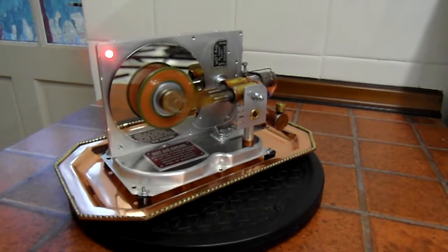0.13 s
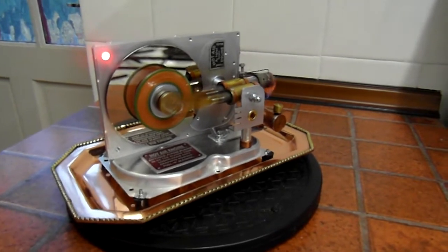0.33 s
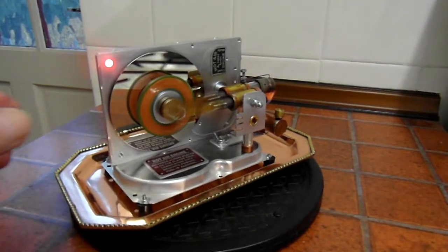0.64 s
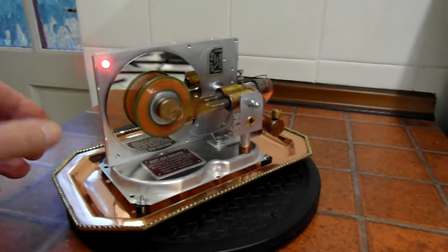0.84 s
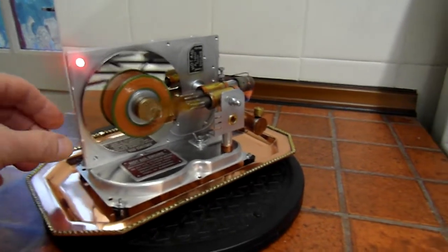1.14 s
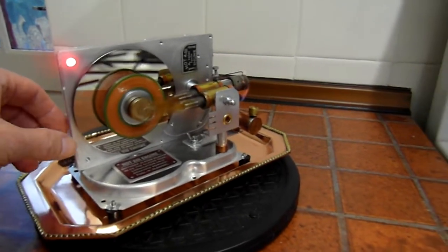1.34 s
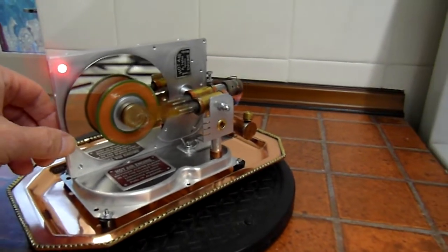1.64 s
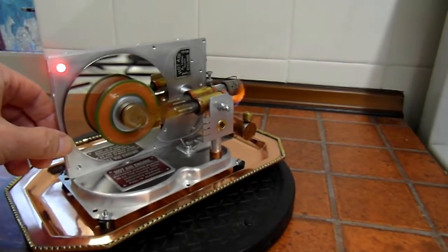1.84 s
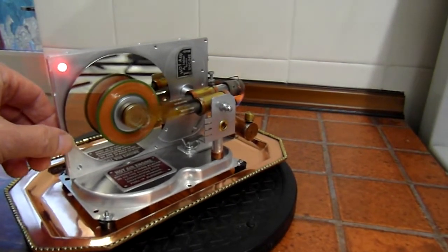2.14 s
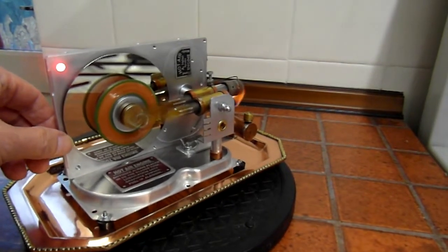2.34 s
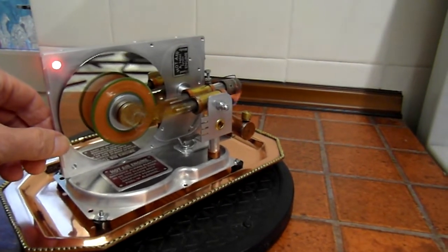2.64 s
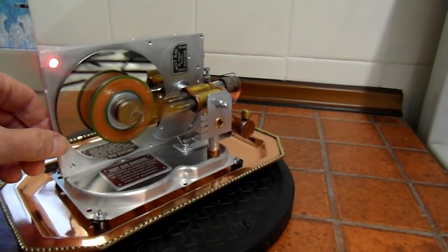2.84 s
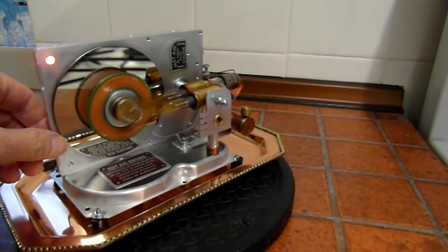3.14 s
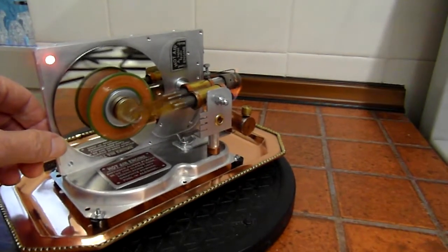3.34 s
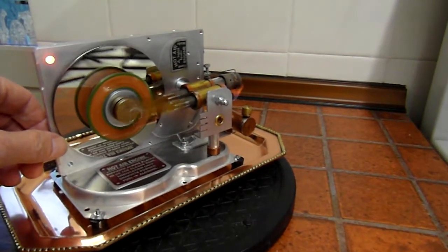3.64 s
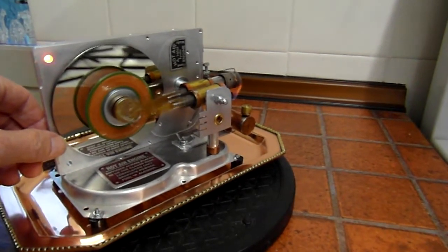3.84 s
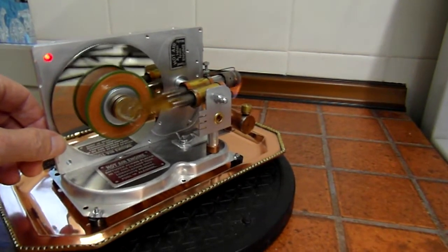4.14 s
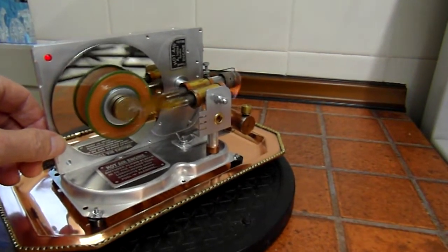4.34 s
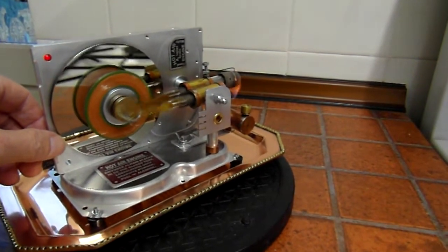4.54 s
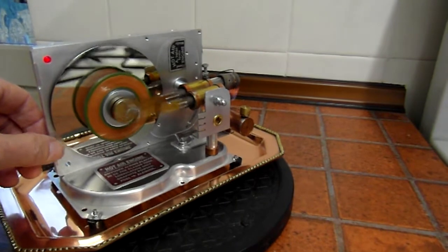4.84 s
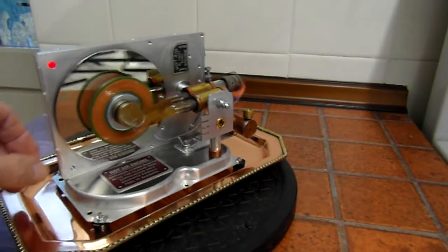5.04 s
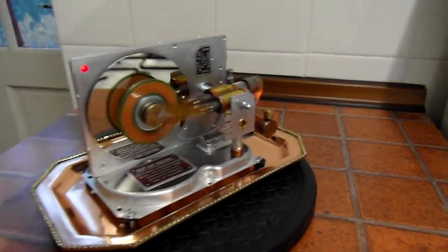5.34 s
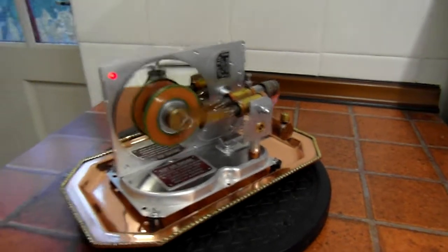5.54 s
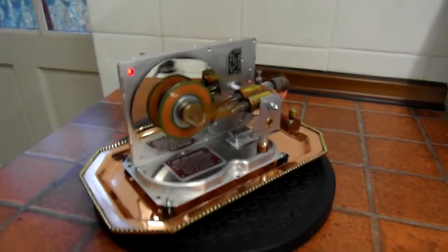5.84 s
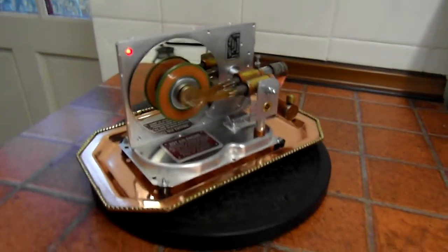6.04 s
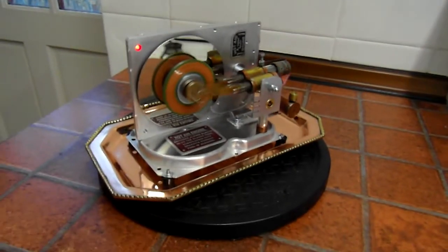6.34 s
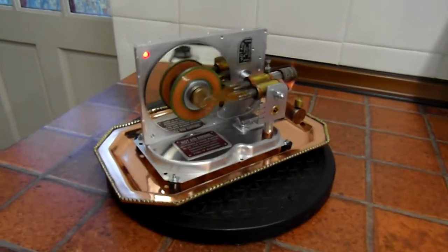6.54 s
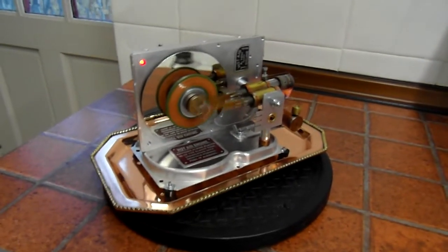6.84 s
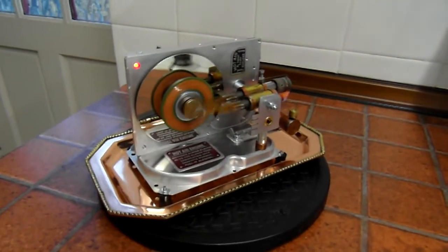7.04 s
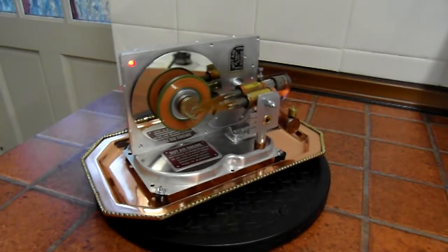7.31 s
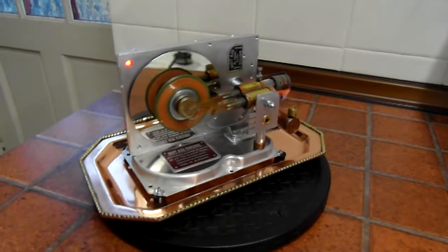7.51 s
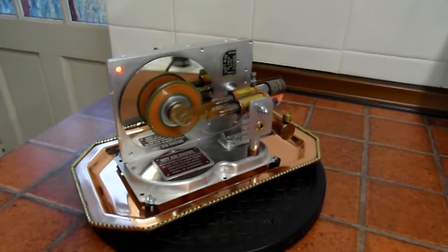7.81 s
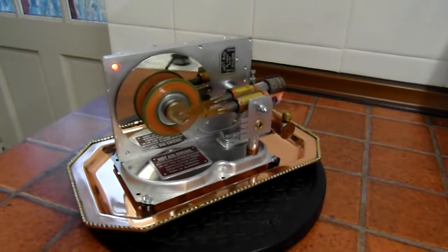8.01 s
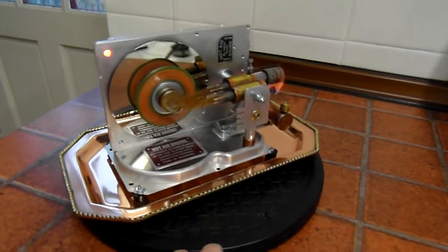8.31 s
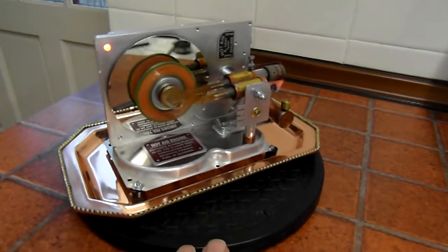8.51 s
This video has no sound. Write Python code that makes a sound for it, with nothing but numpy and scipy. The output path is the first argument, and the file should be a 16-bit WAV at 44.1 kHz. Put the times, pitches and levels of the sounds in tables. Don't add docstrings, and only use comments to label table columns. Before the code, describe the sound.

A tiny engine chatters continuously: four quick metal knocks each turn blur into a rattling purr with crisp clicks and thin rings. After two seconds it slows in steps until about four and a half, where a run of hard ticks stands out, then climbs partway back. Close stereo microphone with handling thumps, in a tiled kitchen with faint background hum.

```python
import sys
import numpy as np
from scipy import signal
from scipy.fft import rfft, irfft, next_fast_len
from scipy.io import wavfile
from scipy.ndimage import uniform_filter1d

SR = 44100
rng = np.random.default_rng(int(sys.argv[2]) if len(sys.argv) > 2 else 0)


def wav_record(signal):
    frames = np.transpose(np.atleast_2d(signal))
    bounded = np.clip(frames, -1, 1)
    quanta = np.round(bounded * 32767).astype(np.int16)
    wavfile.write(sys.argv[1], SR, quanta)


def nominal_scale(level):
    x = np.asarray(level, float) / 20
    return 10 ** x


N = 382347


CRANK_TURNS = (.011, .485)
# speed in turns/s, first strike in turns, second strike in turns.
DISPLACER = [(17.4, .385, .955), (18.3, .395, .94), (19.2, .38, .925), (19.3, .378, .865), (20.5, .36, .86),
             (22.6, .32, .85), (26.7, .255, .74)]
# chatter time in seconds, then dB into base, plate, linkage, cylinder and bare clicks.
CONTACTS = [
    (0.0045, -10, -7, -8, -18, -8),
    (0.005, -2, -8, -7, -12, -12),
    (0.003, -6, -12, -15, -5, -16),
    (0.003, -5, -9, -13, -9, -15),
]
# timing slop in turns, strength spread in dB, chatter share, dB stronger per extra turn/s.
CONTACT_PLAY = [
    (.002, 0.8, 0.15, 0.25),
    (.005, 1.5, 0.085, 0.25),
    (.005, 2.0, 0.13, 0.3),
    (.005, 2.0, 0.08, 0.8),
]
# pitch in Hz, 60 dB fade in seconds, peak in dB at 22 turns/s, dB per extra turn/s.
PINGS = [
    [(1800, .01, -33, .3), (2450, .015, -25, 1.1), (3400, .03, -26, -.5), (3510, .02, -22.5, 1.1),
     (4125, .04, -22, .1), (4700, .016, -19, -.8), (5300, .01, -29, 0), (6100, .005, -29, -.3),
     (8500, .003, -27, .8), (7350, .003, -16, .4), (9700, .003, -21, .7)],
    [(2530, .014, -26, 1.9), (3155, .045, -27.5, -.8), (3500, .02, -30, .3), (3910, .025, -31, 0),
     (4110, .03, -31, -.3), (4650, .015, -29, -.5)],
    [(1345, .03, -31, 1.2), (7400, .004, -27, .6), (10200, .003, -24, .2)],
    [(3100, .025, -31, .3), (7400, .004, -28, .6), (10200, .003, -25, .2)],
]
PING_SPREAD_DB = [2.2, 3, 2, 2]
# pitch in Hz, level in dB, 60 dB fade in seconds.
BASE = [(1218, 3.2, 0.13), (1278, 8.4, 0.074), (1412, 25, 0.0098)]
# pitch in Hz, level in dB, 60 dB fade in seconds.
PLATE = [(1627, -2, 0.0079), (1852, -2, 0.011), (2063, -6.5, 0.019), (2423, 2, 0.011), (2493, 3.5, 0.0089),
         (2836, 1, 0.0055)]
# pitch in Hz, level in dB, 60 dB fade in seconds.
LINKAGE = [(2896, -9.5, 0.025), (3168, -6.5, 0.028), (3225, -9, 0.028), (3476, 1.5, 0.0088),
           (3870, -6, 0.019), (4080, 0.5, 0.025), (4164, 1, 0.013), (4600, 1, 0.0046), (5160, -20, 0.063),
           (5360, -8, 0.0094)]
# pitch in Hz, level in dB, 60 dB fade in seconds.
CYLINDER = [(11075, -6, .03), (11275, 0, .04), (11330, 0, .035), (11460, -3, .045)]
# pitch in Hz, level in dB.
CLICK_COLOUR = [(600, -21), (1100, -9), (2000, -28), (4500, 13), (6400, 13.5), (7400, 18.5), (8500, 14.5),
                (9800, 18), (11000, 17.5)]
# time in seconds, level in dB.
FACING = [(0, -0.5), (3.6, 0), (4.0, -0.5), (4.4, 0.8), (5.2, 1), (5.7, -1), (7.6, -1.1), (8.0, 0),
          (8.67, 0.4)]
# dB at 22 turns/s, dB per extra turn/s, share of the facing swing.
LOUDNESS_LAW = [
    (-27, 0.5, 0.18),
    (-28.5, 0.44, 1.1),
    (-27.5, 0.4, 2.3),
    (-25.5, 0.52, 0.85),
]


def metalwork(angle, speed):
    faster = speed - 22
    facing_db, = in_time(FACING)
    plate_db, *other_db = [db + per_turn_db * faster + share * facing_db
                           for db, per_turn_db, share in LOUDNESS_LAW]
    contact_turns = [*CRANK_TURNS, *at_speed(DISPLACER, speed)]
    forces, clean = np.zeros((5, N)), 0
    for turn, contact, play, modes, luck_db in zip(
            contact_turns, CONTACTS, CONTACT_PLAY, PINGS, PING_SPREAD_DB):
        chatter_s, *share_db = contact
        slop_turns, spread_db, share, gain_db = play
        hit = blows(angle - turn, slop_turns, spread_db)
        clean = clean + pings(hit, modes, luck_db, angle, faster)
        hit = nominal_scale(gain_db * faster) * hit
        dying = signal.lfilter([1], [1, -np.exp(-1 / (chatter_s * SR))], hit)
        chatter = share * dying * grains(per_s=16000, size_db=1.2)
        forces += nominal_scale(np.array(share_db))[:, None] * (hit + chatter)

    seat_s, seat_db = .0023, 8
    forces[3] += nominal_scale(seat_db) * np.roll(forces[3], round(seat_s * SR))

    rattle = nominal_scale(-34 + .5 * faster) * [grains(per_s=9000, size_db=2.0) for part in forces]
    rattle_db = np.array([21.0, -1.5, -4.5, -30.0, -2.0])
    forces += nominal_scale(rattle_db)[:, None] * rattle

    part_modes, signs = (BASE, PLATE, LINKAGE, CYLINDER), (-1, -1, -1, 1)
    parts = [body(force, modes, angle, spread_db=1.14, hold_turns=.5, turn_sign=sign)
             for force, modes, sign in zip(forces, part_modes, signs)]
    clicks = high_pass(colour(forces[4], CLICK_COLOUR), 4, 500)
    parts.append(even(clicks))
    levels_db = [plate_db - 9.5, plate_db - 4.5, *other_db]
    return [nominal_scale(db) * part for db, part in zip(levels_db, parts)] + [clean]


def pings(hit, modes, spread_db, angle, faster):
    bounce_s, bounce_db = .0017, -10
    hit = hit + nominal_scale(bounce_db) * np.roll(hit, round(bounce_s * SR))
    turn = (angle + .2).astype(int)
    luck = nominal_scale(spread_db * rng.standard_normal((len(modes), turn.max() + 1)))
    rings = 0
    for k, (hz, t60, db, per_turn_db) in enumerate(modes):
        force = nominal_scale(db + per_turn_db * faster) * luck[k, turn] * hit
        rings = rings + ring(force, hz, t60)
    return high_pass(rings, 4, 1000)


# time in seconds, peak in dB.
TICKS = [
    (0.157, -8),
    (1.9948, -21),
    (2.9143, -6),
    (3.8568, -17),
    (4.2915, -5),
    (4.345, -2),
    (4.4028, 0),
    (4.459, -3),
    (4.6856, -5),
    (5.0698, -5),
]
# pitch in Hz, level in dB, 60 dB fade in seconds.
TICK_RINGS = [(4650, -20, .015), (7400, -18, .004), (9900, -14, .003), (11300, -12, .05)]


def ticks():
    force = impulses(TICKS)
    return sum(nominal_scale(db) * ring(force, hz, t60) for hz, db, t60 in TICK_RINGS)


# pitch in Hz, level in dB, 60 dB fade in seconds.
BOOM = [(135.6, 6.5, 0.4), (172, 3, 0.14)]
# pitch in Hz, level in dB, 60 dB fade in seconds.
DRUM = [(359.6, -6.5, 0.08), (398, 3.5, 0.053), (425.3, 2.5, 0.093), (491, 0, 0.05)]
# pitch in Hz, level in dB, 60 dB fade in seconds.
LOWER_RING = [(560, -1, 0.076), (598, 1, 0.08)]
# pitch in Hz, level in dB, 60 dB fade in seconds.
UPPER_RING = [(618, 2, 0.076), (636, 5, 0.1), (690, -4, 0.05)]
# pitch in Hz, level in dB, 60 dB fade in seconds.
RIM = [(755, 2, .06), (805, 1, .07), (855, 3, .07), (968, -1.5, 0.08), (1018, 1, 0.08), (1066, 4, 0.084)]
# pitch in Hz, level in dB, 60 dB fade in seconds.
FLAP = [(192, 2.5, 0.063), (243.7, 1.1, 0.21), (303.4, 1.6, 0.069)]
# pitch in Hz, level in dB, 60 dB fade in seconds.
EDGE = [(724.6, 0, 0.44)]
# speed in turns/s, then boom, drum, lower ring, upper ring and rim levels in dB.
TRAY_RESPONSE = [(17.2, -65, -42, -47, -43, -49), (17.73, -56.5, -38, -45, -41, -42),
                 (18.12, -57, -43, -39.5, -36.5, -43.5), (17.7, -68, -40, -43, -37, -42),
                 (19.3, -57, -41, -37, -39, -39), (19.75, -52, -43.5, -33.5, -41, -39.5),
                 (20.4, -60, -41.5, -42, -38, -44.5), (21.2, -59, -43.5, -38.5, -37, -41),
                 (22.38, -54.5, -43, -37.5, -36.5, -40.5), (23.6, -49, -43, -40.5, -42, -41),
                 (24.7, -52.5, -40, -42, -33.5, -44), (27.8, -57.5, -42.5, -46, -41, -41)]
# speed in turns/s, angle of the kick in turns, flap and hum level in dB.
ROCKING = [(17.46, 0.012, -58), (18.42, -0.0826, -52.5), (19.52, -0.0272, -54), (20.03, 0.047, -53),
           (22.25, 0.012, -48), (23.1, 0.094, -50), (25.56, -0.193, -48.5), (26.7, -0.27, -47.5)]
# speed in turns/s, level in dB.
EDGE_RESPONSE = [(18, -56), (25.5, -54), (26.55, -46), (26.8, -45)]


def tray(angle, speed):
    kick_turns, flap_db = at_speed(ROCKING, speed)
    first, second, third, rock = [blows(angle - turn, .001, 1.0) for turn in (.75, .42, .88, kick_turns)]
    loose = 0.015 * grains(per_s=1400, size_db=1.0)
    modes = (BOOM, DRUM, LOWER_RING, UPPER_RING, RIM, FLAP, EDGE)
    forces = [first + 0.5 * second, second + 0.62 * third, rock + 0.18 * second,
              rock + 0.82 * second, rock + 0.56 * second, first + 0.5 * second, rock]
    loose_share = [0.21, 0.75, 0.38, 1.35, 0.94, 0.41, 0.54]
    trim_db = [-2.5, -4, -0.5, -2.0, -1.0, -7.0, 0.0]
    levels_db = at_speed(TRAY_RESPONSE, speed) + [flap_db - 3] + at_speed(EDGE_RESPONSE, speed)
    total = 0
    for db, trim, force, part, share in zip(levels_db, trim_db, forces, modes, loose_share):
        sound = body(force + share * loose, part, angle, spread_db=1.2, hold_turns=6.0, turn_sign=-1)
        total = total + nominal_scale(db + trim) * sound
    shallow = high_pass(total, 4, 105)
    heavy = signal.butter(2, 1400, "low", fs=SR, output="sos")
    return signal.sosfilt(heavy, shallow)


# time in seconds, peak in dB.
FINGER_BUMPS = [
    (2.178, -40),
    (2.96, -26),
    (3.128, -23),
    (3.22, -40),
    (3.443, -27),
]


def finger_bumps():
    force = impulses(FINGER_BUMPS)
    return .5 * ring(force, 70, .015) + .4 * ring(force, 220, .015)


def kitchen(x):
    t60_s = .25
    s = np.arange(int(.4 * SR)) / SR
    tail = rng.standard_normal((2, len(s))) * nominal_scale(-60 * s / t60_s) * (s > .002)
    tail = signal.lfilter([1], [1, -.2], tail)
    tail /= np.sqrt(np.sum(tail ** 2, axis=1, keepdims=True))
    return signal.fftconvolve(x[None], tail, axes=1)[:, :N]


# time in seconds, level in dB.
GRIP = [(0, -58), (1.5, -54.5), (3.0, -55), (3.5, -54), (4.0, -61), (5.0, -57), (6.0, -59), (7.0, -65),
        (7.5, -58), (8.67, -59)]
# pitch in Hz, level in dB per Hz.
RUMBLE = [(15, -2), (25, -6), (60, -8), (110, -4), (200, -24)]
# pitch in Hz, level in dB per Hz.
HUM = [(100, -21), (180, -10.5), (300, -9), (400, -9), (1200, -13.5), (2400, -43)]


def background(speed):
    rumble_db, = in_time(GRIP)
    hum_db = at_speed(ROCKING, speed)[1]
    shared, own = rng.standard_normal((2, N)), rng.standard_normal((2, 2, N))
    rumble = nominal_scale(rumble_db) * rms_one(colour(shared[0] + 2.0 * own[0], RUMBLE))
    hum = nominal_scale(hum_db) * rms_one(colour(shared[1] + 0.73 * own[1], HUM))
    return (rumble + hum) * nominal_scale(np.array([[-.8], [.8]]))


def fridge():
    hum_hz, hum_db = 124.8, -59.5
    return nominal_scale(hum_db) * even(ring(rng.standard_normal(N), hum_hz, 0.83))


def blows(angle, slop_turns, spread_db):
    at = np.flatnonzero(np.diff(np.floor(np.maximum.accumulate(angle))) > 0)
    luck = rng.standard_normal((len(at), 2))
    late = (slop_turns * luck[:, 0] * SR / 22).astype(int)
    out = np.zeros(N)
    out[np.clip(at + late, 0, N - 1)] = nominal_scale(spread_db * luck[:, 1])
    return out


def impulses(rows):
    force = np.zeros(N)
    force[[round(s * SR) for s, db in rows]] = nominal_scale(np.array(rows)[:, 1])
    return force


def grains(per_s, size_db):
    sizes = nominal_scale(size_db * np.minimum(rng.exponential(1, N), 4)) * rng.choice([-1, 1], N)
    return rms_one(sizes * (rng.random(N) < per_s / SR))


def ring(force, hz, t60):
    r, w = nominal_scale(-60 / (t60 * SR)), 2 * np.pi * hz / SR
    return signal.lfilter([0, np.sin(w)], [1, -2 * r * np.cos(w), r * r], force + 1e-18)


def body(force, modes, angle, spread_db, hold_turns, turn_sign):
    step = angle / hold_turns
    luck = spread_db * rng.standard_normal((len(modes), int(step.max()) + 2))
    sound = 0
    for k, (hz, db, t60) in enumerate(modes):
        drive_db = db + np.interp(step, np.arange(luck.shape[1]), luck[k])
        sound = sound + turn_sign ** k * ring(force * nominal_scale(drive_db), hz, t60)
    return even(high_pass(sound, 4, .78 * modes[0][0]))


def high_pass(x, order, hz):
    return signal.sosfilt(signal.butter(order, hz, "high", fs=SR, output="sos"), x)


def colour(x, points):
    hz, db = np.transpose(points)
    size = next_fast_len(N)
    bins = np.log(np.arange(size // 2 + 1) * SR / size + 1)
    return irfft(rfft(x, size) * nominal_scale(np.interp(bins, np.log(hz), db)), size)[..., :N]


def rms_one(x):
    return x / np.sqrt(np.mean(x ** 2) + 1e-20)


def even(x):
    return x / np.sqrt(uniform_filter1d(x ** 2, size=11025) + 1e-20)


def in_time(rows):
    s, *columns = np.transpose(rows)
    return [np.interp(np.arange(N) / SR, s, c) for c in columns]


def at_speed(rows, speed):
    rate, *columns = np.transpose(sorted(rows))
    return [np.interp(speed, rate, c) for c in columns]


def ports(x, lag_s, pan_db):
    size = next_fast_len(N)
    delay = np.exp(-2j * np.pi * np.arange(size // 2 + 1) * SR / size * lag_s)
    left = irfft(rfft(x, size) * delay, size)[:N]
    return np.array([left * nominal_scale(pan_db / 2), x * nominal_scale(-pan_db / 2)])


# time in seconds, speed in turns/s.
SPEED = [(0, 26.726), (0.41, 26.779), (1.52, 26.605), (2.07, 26.598), (2.33, 25.253), (2.57, 24.936),
         (2.84, 23.044), (3.12, 22.578), (3.49, 22.642), (3.82, 21.074), (4.41, 17.399), (4.93, 18.233),
         (5.66, 18.979), (6.49, 19.552), (7.86, 20.124), (8.7, 20.46)]


def scene():
    speed, = in_time(SPEED)
    start_turns = -.196
    angle = start_turns + np.cumsum(speed) / SR
    base, plate, linkage, cylinder, clicks, clean = metalwork(angle + 1, speed)
    linkage = linkage + clean + ticks()
    low = tray(angle + 1, speed)

    lag_s = 2.4e-5
    near = ports(base + plate + low, lag_s, pan_db=-1.5)
    near = near + ports(linkage, 0.52 * lag_s, pan_db=-0.7)
    near = near + ports(cylinder, 0.77 * lag_s, pan_db=-0.5)
    near = near + ports(clicks, lag_s, pan_db=1.0)

    far = nominal_scale(-11) * kitchen(base + plate + linkage + cylinder + clicks + 0.32 * low)
    far = colour(far, [(7000, 0), (10800, -5)])
    narrow = colour(far[0] - far[1], [(500, -38.0), (2000, 0.0), (6000, 4.0), (10300, 11.0), (10900, 1.0)]) / 2
    room = far.mean(axis=0) + narrow * [[1], [-1]]
    motor = fridge() * nominal_scale(np.array([[-.9], [.9]]))
    return near + room + background(speed) + motor + finger_bumps()


def top_cut(x):
    return signal.sosfilt(signal.butter(12, 12890, fs=SR, output="sos"), x)


# pitch in Hz, level in dB.
TOP_EDGE = [(11480, 0), (11530, -16), (11700, -18), (12000, -34), (13000, -58)]


def record(dry):
    ceiling = .66
    excess = dry - ceiling * np.tanh(dry / ceiling)
    shaved = high_pass(excess, 2, 400)
    mix = colour(1.261 * (dry - shaved), TOP_EDGE)
    return top_cut(mix)


dry = scene()
out = record(dry)
wav_record(out)
```